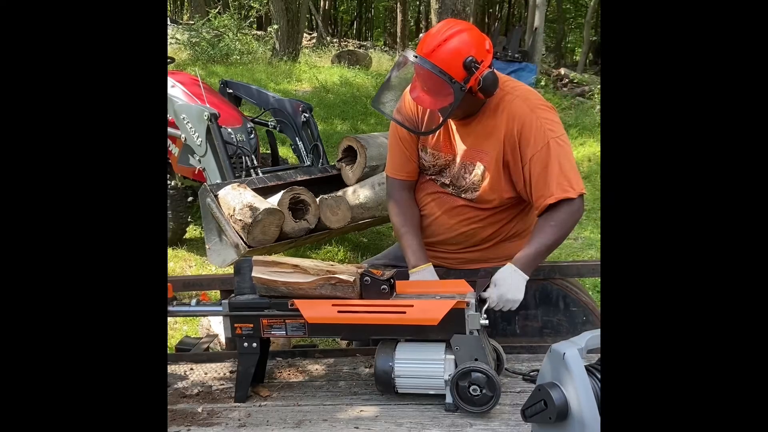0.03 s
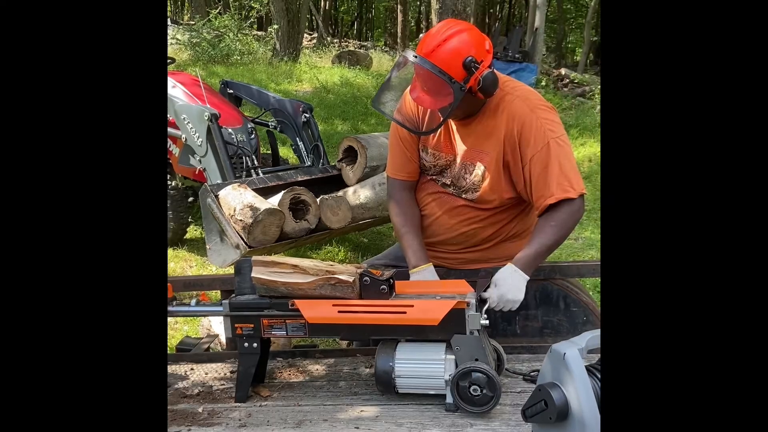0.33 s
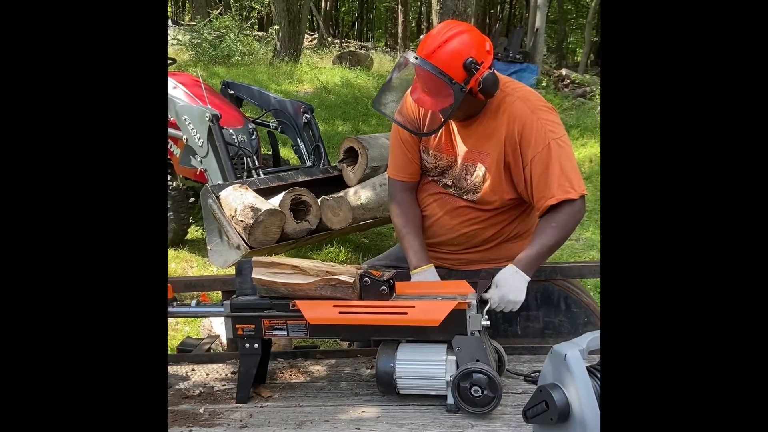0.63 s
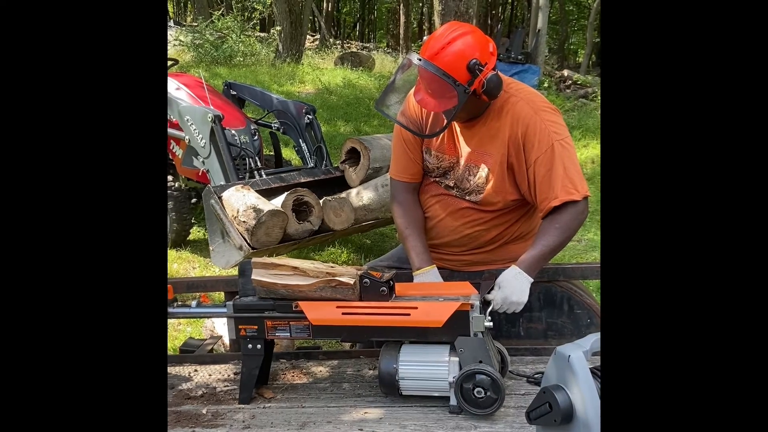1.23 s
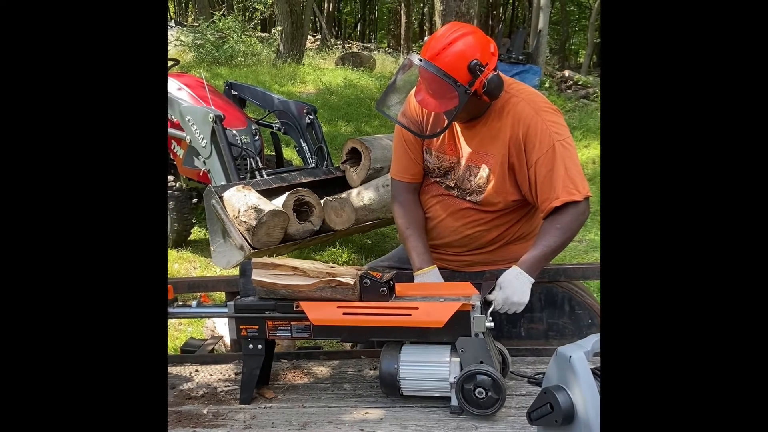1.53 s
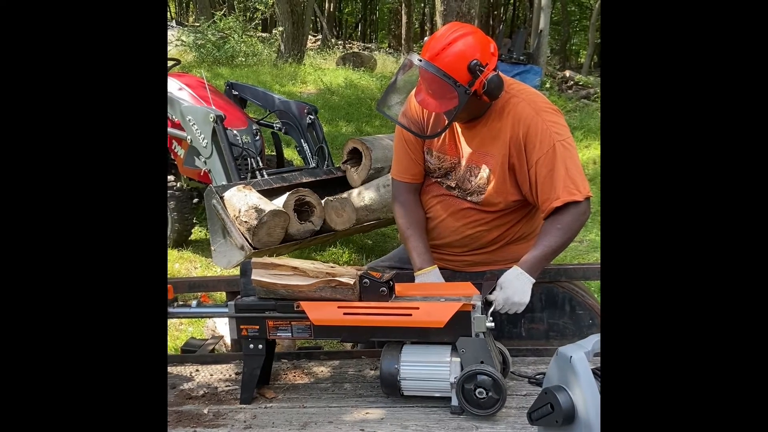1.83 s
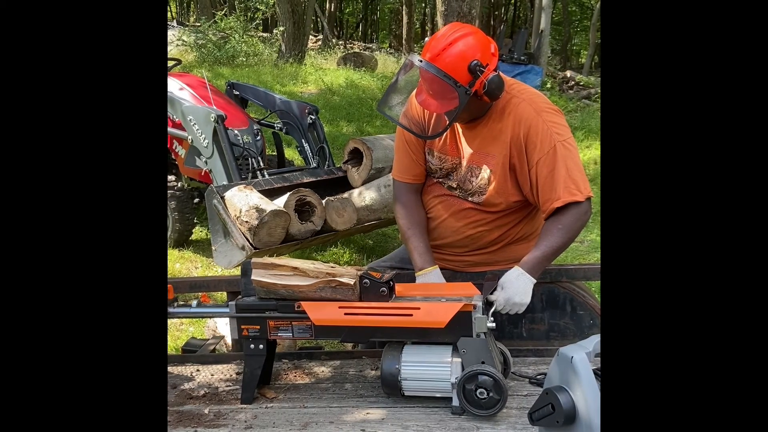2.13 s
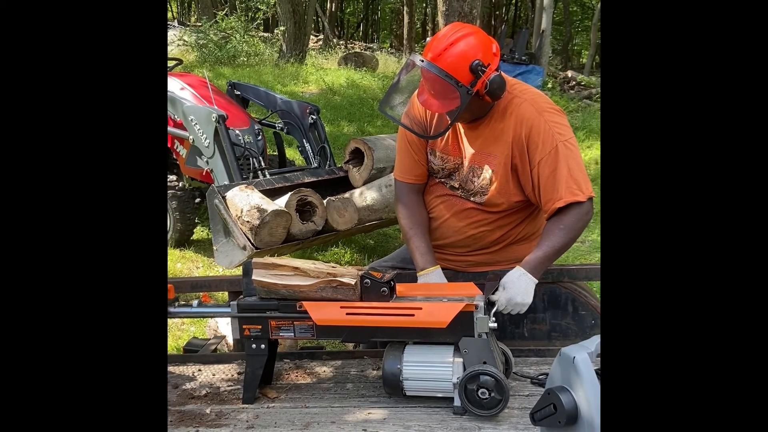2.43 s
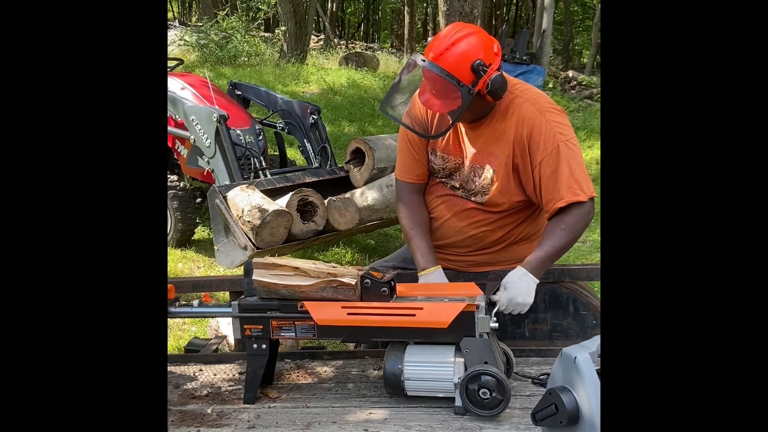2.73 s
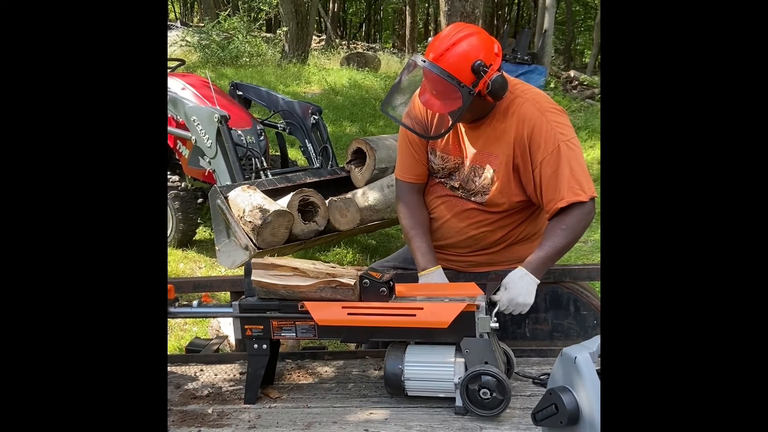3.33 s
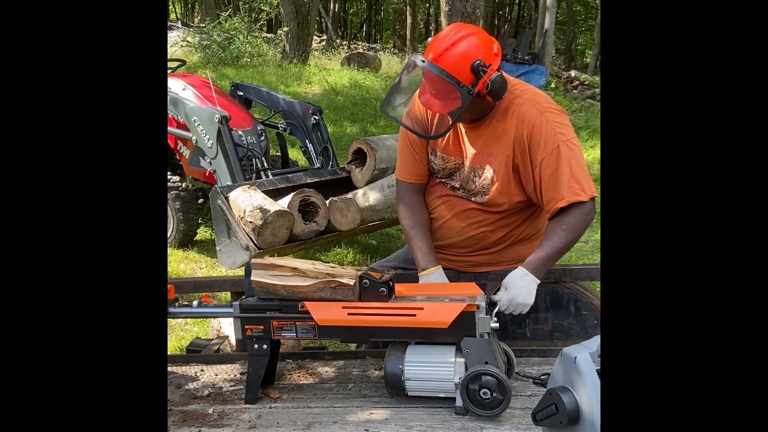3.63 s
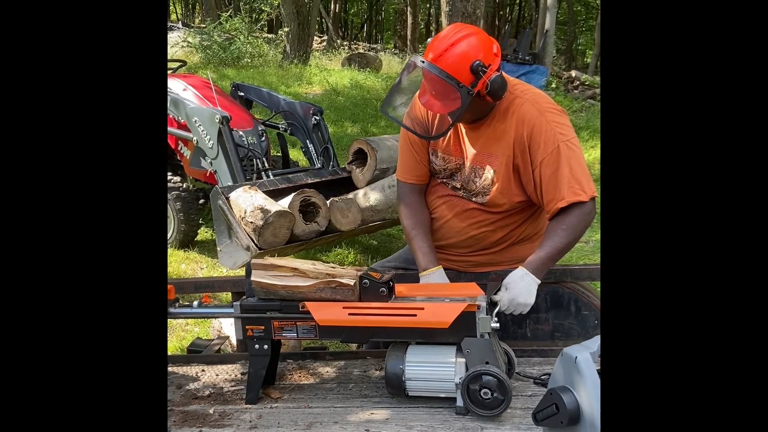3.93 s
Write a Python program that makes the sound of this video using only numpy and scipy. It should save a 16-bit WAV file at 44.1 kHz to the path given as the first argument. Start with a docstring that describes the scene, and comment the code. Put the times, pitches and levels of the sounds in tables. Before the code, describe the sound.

Close to the microphone outdoors, a log judders and squeals in an electric splitter, then cracks open with a few thuds. Scattered snaps and crackling fibres follow over the machine's steady hum, whine and rushing fan.

```python
"""A log is forced onto the wedge of an electric log splitter. It sticks and slips in rasping bursts,
creaks, and gives way with four crunching thuds and cracks. Then its fibres tear with thinning crackle
and a few sharp snaps. Behind it the motor hums, the pump whines, and the fan and oil rush.
It all happens outdoors, close to a small microphone with two openings (ports), left and right."""
import sys
import numpy as np
from scipy import signal
from scipy.fft import rfft, irfft, next_fast_len
from scipy.io import wavfile
from scipy.ndimage import map_coordinates

SR = 44100
rng = np.random.default_rng(int(sys.argv[2]) if len(sys.argv) > 2 else 0)


def wav_record(signal):
    """Record a signal, one row per channel, as 16-bit PCM in the file named by sys.argv[1]."""
    frames = np.transpose(np.atleast_2d(signal))
    bounded = np.clip(frames, -1, 1)
    # unit amplitude maps onto the largest positive 16-bit level
    quanta = np.round(bounded * 32767).astype(np.int16)
    wavfile.write(sys.argv[1], SR, quanta)


N = 176400


def judder():
    """The log sticks and slips. Each slip is a grainy rasp that rings the steel, with a rising squeal."""
    # Slips of the log on the steel. Each row: start in seconds, level in dB, length in seconds.
    slips = [(0.011, -27, 0.023), (0.043, -21.5, 0.0083), (0.071, -23.5, 0.011), (0.103, -23, 0.016),
             (0.127, -23.5, 0.0093), (0.15, -22.5, 0.012), (0.177, -19.5, 0.011), (0.205, -21, 0.0048),
             (0.229, -19.5, .012), (0.263, -21, 0.013), (0.289, -21, 0.016), (0.32, -23, 0.01),
             (0.351, -19, 0.011), (0.383, -21, 0.012), (0.414, -21.5, 0.014), (0.447, -20, 0.013),
             (0.482, -21, 0.011), (0.517, -21, 0.016), (0.545, -25, 0.012), (0.573, -20.5, 0.014),
             (0.603, -22, 0.012), (0.635, -22.5, 0.017), (0.669, -22.5, 0.021), (0.706, -25.5, 0.034),
             (0.753, -25, 0.015), (0.787, -24, 0.017)]
    # Tone of the rubbed wedge and bed. Each row: frequency in Hz, relative level in dB.
    rasp_tone = [(150, -28), (400, -12), (1600, -18.5), (2050, -8), (2800, -11), (3850, -12.5), (4650, -11),
                 (4900, -1), (5450, -7), (5700, -4), (7000, -18.5), (8600, -1), (11200, -14),
                 (15300, -16.5)]
    # Ringing of the steel. Each row: pitch in Hz, width in Hz, level in dB over the rasp.
    steel = [(1376, 70, 13), (1990, 85, 7.5), (2084, 52, 4.5), (2440, 55, 5.5), (3214, 68, 13),
             (4980, 24, 9.5), (5100, 24, 3)]
    squeal_hz, rise_hz, rise_s = 5050, 390, .0166
    attack_s, release_s = .0018, .0019
    force, squeal, t = np.zeros(N), np.zeros(N), np.arange(SR // 10) / SR
    for start, db, length in slips:
        fade = np.exp(-np.maximum(t - length / 2, 0) / (release_s + length / 2))
        slip = amp(db) * np.minimum(t / attack_s, 1) * fade
        hz = squeal_hz + rise_hz * (1 - np.exp(-t / rise_s))
        hz *= 1 + .018 * wobble(505)[:len(t)]
        add(force, start, slip)
        add(squeal, start, slip * np.sqrt(2) * np.sin(2 * np.pi * np.cumsum(hz) / SR))
    grain = unit(rng.standard_normal(N) * amp(-wobble(700)))
    rasp = body(force * grain, rasp_tone)
    return amp(-2.5) * ringing(rasp, steel) + amp(-6) * squeal


def thuds():
    """The log gives way: each thud is six quick, crunching jolts that swell and die. The frame rings."""
    # The thuds. Each row: time of the strongest jolt in seconds, jolt level in dB, ring level in dB.
    thud_rows = [(.580, -17, -15.5), (0.6453, -11, -14), (0.7508, -13, -13), (.819, -23, -15.5)]
    # Tone of the log's body. Each row: frequency in Hz, relative level in dB.
    log_tone = [(40, -23), (100, -31), (170, 0), (230, 4), (320, 2), (450, 0.5), (650, -8.5), (1000, -10.5),
                (1600, -26), (3000, -29), (9000, -30)]
    # Ringing of the frame. Each row: pitch in Hz, relative level in dB, seconds to fade by 60 dB.
    frame_rings = [(440, -5.5, 0.097), (546.4, -13.5, 0.51), (1920, -32, 0.091)]
    jolt_s, rise_db, fall_db = .0063, 4.5, 6.5  # steps from one jolt to the next
    jolts, ring, t = np.zeros(N), np.zeros(N), np.arange(SR // 2) / SR
    for peak_s, db, ring_db in thud_rows:
        for k in np.arange(6) - 2:
            loss_db = max(-k * rise_db, k * fall_db) + rng.normal(0, 1)
            crunch = rng.standard_normal(len(t)) * np.exp(-t / jolt_s)
            jolt = (t == 0) + amp(-8.5) * crunch / np.linalg.norm(crunch)  # a click plus its crunch
            start = peak_s + jolt_s * (k + rng.normal(0, .065))
            add(jolts, start, amp(db - loss_db) * np.sqrt(jolt_s * SR) * jolt)
        for hz, level, fade_s in frame_rings:
            wave = np.sin(2 * np.pi * (hz * t + rng.random()))
            add(ring, peak_s, amp(ring_db + level - 60 * t / fade_s) * wave)
    return body(jolts, log_tone) + ring


def cracks():
    """Bundles of fibres snap and knock the wood, splinters twang, and single fibres crackle between."""
    # Breaking bundles. Each row: start in seconds, level in dB, fade time in seconds,
    # knock level in dB compared with the crack, knock pitch in Hz.
    bundles = [(.572, -26, .003, -1, 800), (.633, -25, .004, 6, 970), (0.738, -13, 0.0046, 7.5, 1460),
               (.740, -11.5, 0.0031, -14, 1090), (0.8074, -8, 0.0027, -5.5, 2720),
               (.811, -16.5, .003, 4.5, 910), (.8685, -14, 0.0011, -15, 2570),
               (0.871, -19, 0.0027, 0, 2420), (0.9098, -13.5, 0.0013, -8.5, 1600),
               (.970, -13, 0.0018, -6.5, 1440), (0.9756, -15.5, 0.0032, -2.5, 980),
               (1.032, -15, 0.0022, -7, 2500), (1.100, -15, 0.0025, -8, 1430),
               (1.105, -26.5, 0.002, 10, 930), (1.164, -19.5, 0.0043, -3, 2230),
               (1.392, -19.5, .003, -2, 970), (1.4281, -12.5, 0.0015, -9.5, 1430),
               (1.589, -18.5, 0.002, -9, 1010), (1.631, -24, .002, -17, 1000),
               (1.8518, -17.5, 0.0018, -6, 2420), (1.981, -23.5, 0.0043, 3, 900),
               (2.2151, -8.5, 0.0025, -5, 1140), (2.620, -14.5, 0.0018, -14, 2100),
               (3.0595, -7, 0.0023, -8, 1070), (3.0635, -26, .006, 9.5, 820)]
    # Splinters breaking free. Each row: start in seconds, pitch in Hz, level in dB.
    twangs = [(.740, 2650, -13), (.809, 2480, -11.5), (2.216, 5270, -17), (2.2167, 1004, -12.5),
              (2.6202, 4100, -15.5), (2.6202, 4990, -14.5), (3.058, 2250, -13.5), (3.06, 5300, -8),
              (3.061, 860, -12.5)]
    # Loudness of the small tearing fibres. Each row: time in seconds, level in dB.
    crackle_level = [(0, -42), (.7, -50), (1, -46), (1.5, -36.5), (2.1, -42), (2.5, -45), (4, -53)]
    # Tone of snapping fibres. Each row: frequency in Hz, relative level in dB.
    snap_tone = [(70, -53), (250, 3), (700, -10), (1400, -2.5), (1900, -3.5), (2700, 1), (3600, 3.5),
                 (4500, 2.5), (5400, 6.5), (7000, -1), (9500, -2.5), (12000, -11.5), (15500, -12.5)]
    # Tone of the wood under the crackle. Each row: frequency in Hz, relative level in dB.
    knock_tone = [(60, -24), (150, -20), (300, -4), (600, 20), (950, 5.5), (1400, -3), (1900, -22),
                  (4000, 1), (12000, -71)]
    fibres_per_s, spread_db = 90, 4
    breaks, knocks, t = np.zeros(N), np.zeros(N), np.arange(SR // 20) / SR
    knock_shape = np.exp(-t / .0038) * (1 - np.exp(-t / .0012))
    for start, db, fade_s, knock_db, hz in bundles:
        snap_noise, knock_noise, grain = rng.standard_normal((3, len(t)))
        fade = np.exp(-t / fade_s)
        snap = unit(snap_noise * fade * amp(3 * np.tanh(grain)))  # the grain makes it spiky
        add(breaks, start, amp(db) * snap * np.sqrt(np.mean(fade ** 2)))
        piece = signal.butter(2, [hz / 1.42, hz * 1.42], "bandpass", fs=SR, output="sos")
        knock = unit(signal.sosfilt(piece, knock_noise * knock_shape))
        add(knocks, start, amp(db + knock_db) * knock * np.sqrt(np.mean(knock_shape ** 2)))
    torn = rng.random(N) < fibres_per_s / SR
    fibres = torn * amp(spread_db * np.clip(rng.standard_normal(N), -2, 2))
    tearing = signal.fftconvolve(fibres, np.exp(-t / .0009))[:N]
    crackle = unit(tearing * rng.standard_normal(N)) * amp(curves(crackle_level)[0])
    twang_shape = (1 - np.exp(-t / .00044)) * np.exp(-t / .0022)
    for start, hz, db in twangs:
        add(knocks, start, amp(db) * np.sin(2 * np.pi * hz * t) * twang_shape)
    return body(breaks + crackle, snap_tone) + knocks + amp(-9) * body(crackle, knock_tone)


def short_tones():
    """Wavering tones from log and machine: creaks, soft bumps, brief steel ringing, an opening whine."""
    # Tones that swell and fade. Each row: start in seconds, pitch in Hz, level in dB, length in seconds.
    tone_rows = [(0, 712, -40, 0.75), (0.226, 62, -40, .04), (0.529, 334, -24, 0.038),
                 (0.657, 326, -21, 0.026), (0.748, 1967, -21.5, 0.025), (0.767, 1986, -34, 0.063),
                 (0.844, 91.5, -39, 0.1), (0.849, 1263, -29.5, 0.041), (0.906, 313, -28.5, 0.043),
                 (1.336, 316.3, -36, 0.28), (3.114, 92, -39, 0.054)]
    track = np.zeros(N)
    for start, hz, db, length in tone_rows:
        swell = np.sin(np.pi * np.minimum(np.arange(N) / SR / length, 1))
        phase = 2 * np.pi * hz * np.cumsum(1 + .012 * wobble(181)) / SR
        add(track, start, amp(db) * swell * np.sin(phase))
    return track


def machine():
    """The motor hums with the mains power and the pump's gear teeth whine, over the rush of fan and oil."""
    # Motor hum. Each row: multiple of the mains frequency, level in dB.
    hum_tones = [(1, -59.5), (2, -45.8), (4, -41.3), (6, -54)]
    # Pump whine. Each row: multiple of the shaft's turning rate, level in dB.
    whine_tones = [(11, -44.5), (12, -52.5), (23, -53), (24, -52.5), (33, -47.5), (44, -50), (66, -57.5),
                   (77, -48), (88, -73), (89, -54), (99, -52)]
    # The whine is weaker until the log gives way. Each row: time in seconds, level change in dB.
    whine_level = [(.6, -2.5), (1.1, 0)]
    mains_hz, tooth_hz, teeth = 60, 656.6, 11
    tooth_phase = 2 * np.pi * tooth_hz * np.cumsum(1 + .0017 * wobble(14)) / SR  # the speed drifts
    tooth_phase += .068 * np.sin(tooth_phase / teeth)  # and sways once per shaft turn
    shaft_phase = tooth_phase / teeth
    rush = fan_and_oil(shaft_phase, tooth_phase)
    motor_hum = machine_tones(2 * np.pi * mains_hz * np.arange(N) / SR, hum_tones, flutter_db=.4)
    pump_whine = machine_tones(shaft_phase, whine_tones, flutter_db=1)
    return rush + motor_hum + amp(curves(whine_level)[0]) * pump_whine


def machine_tones(phase, rows, flutter_db):
    """Pure tones at whole multiples of one rate, each fluttering in loudness."""
    track = np.zeros(N)
    for multiple, db in rows:
        gain = np.sqrt(2) * amp(db + flutter_db * wobble(16))
        track += gain * np.sin(round(multiple) * phase + 2 * np.pi * rng.random())
    return track


def fan_and_oil(shaft_phase, tooth_phase):
    """Air and oil rush through the housing, pulsing with each shaft turn and each gear tooth."""
    # Tone of the rush. Each row: frequency in Hz, relative level in dB.
    rush_tone = [(25, -11), (55, -7.5), (100, 4), (170, 1.5), (330, 6), (520, -3), (980, -2), (1200, -9.5),
                 (1650, -7), (2030, -1), (2350, -7), (2950, -14.5), (3600, -8.5), (3950, 1), (4250, -6),
                 (4700, 0.5), (5900, 0), (7000, -12), (9300, -1), (11000, -15), (13000, -19.5),
                 (15500, -31)]
    # Ringing of the housing. Each row: pitch in Hz, width in Hz, level in dB over the rush.
    housing = [(1022, 37, 0.5), (1338, 64, 2), (2020, 50, -2), (2617, 40, 7.5), (3281, 34, 10.5),
               (3316, 51, 9.5), (3715, 20, 4.5), (5310, 15, 10.5)]
    # Loudness of the rush. Each row: time in seconds, then bass, middle and treble gain in dB.
    rush_level = [(0, -35, -28.5, -34), (.5, -36, -30, -33), (.8, -24.5, -28, -34),
                  (.95, -30.5, -34.5, -37.5), (1.1, -29, -32.5, -32.5), (1.4, -28, -29, -31.5),
                  (1.9, -29.5, -30, -33.5), (2.3, -32.5, -30.5, -34.5), (3, -32, -29, -33.5),
                  (3.4, -34, -30.5, -35.5), (3.8, -32, -29.5, -36), (3.9, -34, -28.5, -32.5),
                  (4, -33, -28.5, -35)]
    bass_hz, treble_hz, flutter_db = 440, 2800, 1.67
    pulsing = (1 + .11 * np.sin(shaft_phase)) * (1 + .31 * np.sin(tooth_phase))
    flow = unit(rng.standard_normal(N) * pulsing)
    rush = ringing(body(flow, rush_tone), housing)
    bass = filtered(rush, lambda hz: 1 / (1 + (hz / bass_hz) ** 4))
    treble = filtered(rush, lambda hz: 1 - 1 / (1 + (hz / treble_hz) ** 4))
    parts = zip((bass, rush - bass - treble, treble), curves(rush_level))
    return sum(part * amp(db + flutter_db * wobble(45)) for part, db in parts)


def scatter(x, t60):
    """A short blur of echoes from the deck and machinery, fading by 60 dB in t60 seconds."""
    t = np.arange(SR // 4) / SR
    tail = rng.standard_normal(len(t)) * amp(-60 * t / t60) * (1 - np.exp(-t / .002))
    return signal.fftconvolve(x, tail / np.linalg.norm(tail))[:N]


def body(x, spectrum, size=8192):
    """Pass x through a ringing object; only the shape of its spectrum matters, not the level."""
    cep = irfft(np.log(amp(along(spectrum, np.fft.rfftfreq(size, 1 / SR)))))
    # Fold the second half onto the first, so the ring comes after each hit and never before.
    cep[1:size // 2] *= 2
    cep[size // 2 + 1:] = 0
    ring = irfft(np.exp(rfft(cep)))
    return signal.fftconvolve(x, ring / np.linalg.norm(ring))[:N]


def resonance(hz, centre_hz, width_hz):
    """How one ringing pitch responds to each frequency."""
    return 1j * hz * width_hz / (centre_hz ** 2 - hz ** 2 + 1j * hz * width_hz)


def ringing(x, modes):
    """Add narrow ringing pitches on top of x."""
    return filtered(x, lambda hz: 1 + sum(amp(db) * resonance(hz, centre, width)
                                          for centre, width, db in modes))


def filtered(x, response):
    """Change the level and phase of each frequency in x by response(hz)."""
    m = next_fast_len(N + SR // 2)
    return irfft(rfft(x, m) * response(np.fft.rfftfreq(m, 1 / SR)), m)[..., :N]


def amp(db):
    """Turn decibels into a gain."""
    return 10 ** (np.asarray(db) / 20)


def unit(x):
    """Scale x to an average (rms) level of 1."""
    return x / np.sqrt(np.mean(x ** 2) + 1e-20)


def along(points, hz):
    """Read between (Hz, value) points on a logarithmic frequency scale."""
    f, v = np.transpose(points)
    return np.interp(np.log(hz + 1), np.log(f + 1), v)


def curves(rows):
    """One value per sample for each column after the time."""
    s, *cols = np.transpose(rows)
    return [np.interp(np.arange(N) / SR, s, c) for c in cols]


def wobble(rate):
    """A smooth curve through `rate` random values a second."""
    return map_coordinates(rng.standard_normal(N), [np.arange(N) * rate / SR], mode="wrap")


def add(track, s, sound):
    """Mix a sound into a track at s seconds."""
    i = max(0, round(s * SR))
    track[i:i + len(sound)] += sound[:N - i]


def scene():
    """Log and machine lie close together; their sound reaches each port with its own phase and level."""
    # Timing between the ports. Each row: frequency in Hz, radians by which the left leads.
    port_phase = [(20, 0), (300, -.1), (650, -.65), (850, -.35), (1050, -.65), (1300, .05), (2100, .05),
                  (2600, .8), (2850, -.4), (3200, 1.5), (3500, .65), (4400, .75), (5200, .1), (5700, .6),
                  (6460, 2.3), (7400, 3.14), (8300, 3.7), (9820, 6.1), (11500, 6.6), (12500, 9),
                  (13700, 9.5), (14600, 10), (15800, 12.4)]
    # Balance between the ports. Each row: frequency in Hz, left minus right level in dB.
    port_balance = [(120, 0), (350, -.7), (650, -5), (1000, -2), (2000, -.3), (2700, -4), (3300, -3),
                    (4300, -1.5), (5000, 0), (15000, 0)]
    # Scattered echoes that widen the sound. Each row: frequency in Hz, gain in dB.
    scatter_tone = [(100, -40), (300, -26), (600, -19), (1300, -17), (2000, -13), (2700, -8), (5000, -15),
                    (9000, -11), (14000, -10)]
    splitting = judder() + thuds() + short_tones() + cracks()
    motor = machine()
    direct = motor + splitting + amp(-17) * scatter(splitting, t60=.06)
    far = scatter(motor, t60=.4) + scatter(splitting, t60=.05)
    wide = filtered(far, lambda hz: amp(along(scatter_tone, hz)))
    sides = np.array([[1], [-1]])  # left, right
    balance = lambda hz: amp(sides * along(port_balance, hz) / 2)
    lead = lambda hz: np.exp(1j * sides * along(port_phase, hz) / 2)
    return filtered(direct + sides * wide, lambda hz: balance(hz) * lead(hz))


def record(dry):
    """The recorder rounds off the highest peaks, thins the deep bass and cuts the very top treble."""
    ceiling, low_cut_hz, top_hz = .9, 20, 15850
    limited = dry / (1 + np.abs(dry / ceiling) ** 6) ** (1 / 6)
    return filtered(limited, lambda hz: (hz < top_hz) * hz ** 2 / np.sqrt(hz ** 4 + low_cut_hz ** 4))


dry = scene()
out = record(dry)
wav_record(out)
```